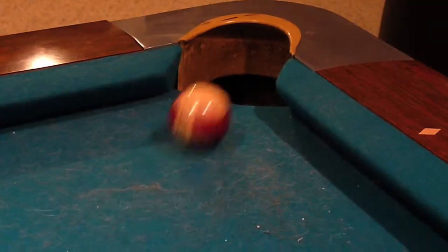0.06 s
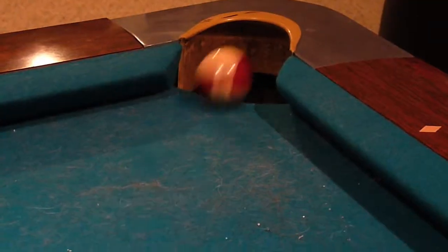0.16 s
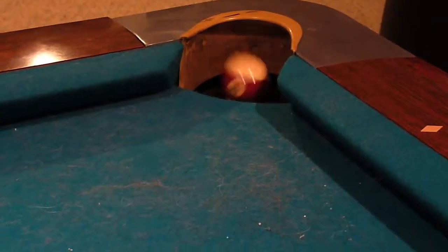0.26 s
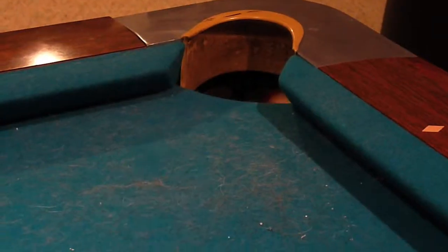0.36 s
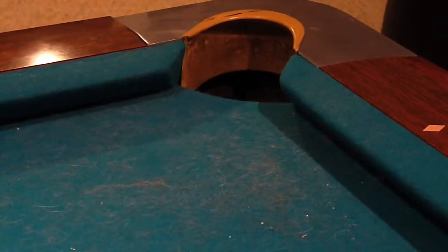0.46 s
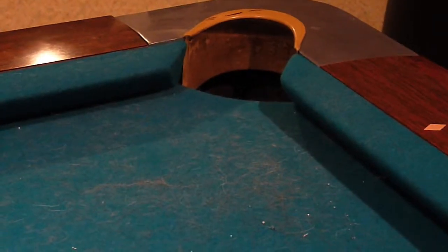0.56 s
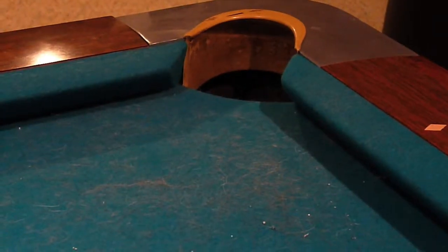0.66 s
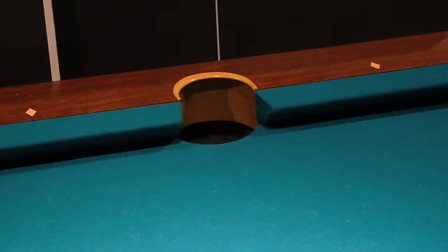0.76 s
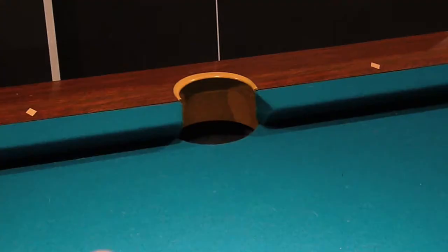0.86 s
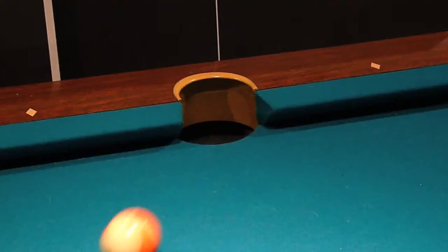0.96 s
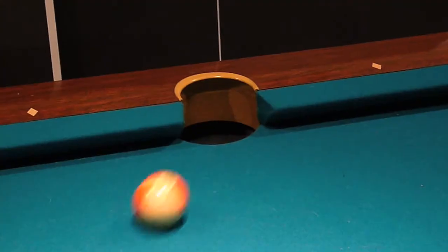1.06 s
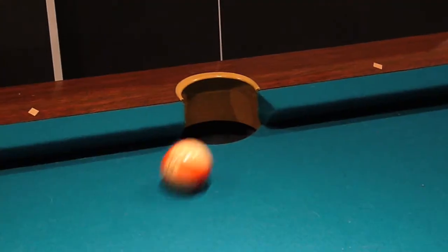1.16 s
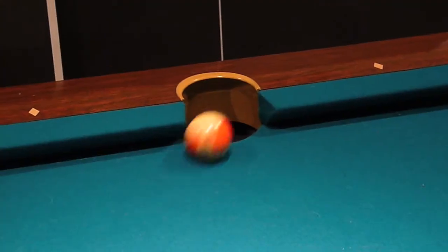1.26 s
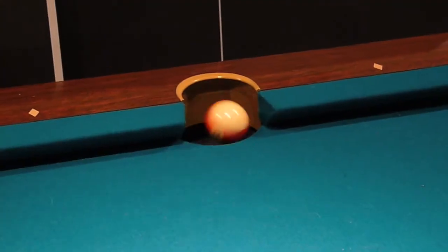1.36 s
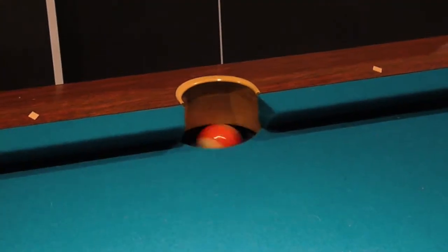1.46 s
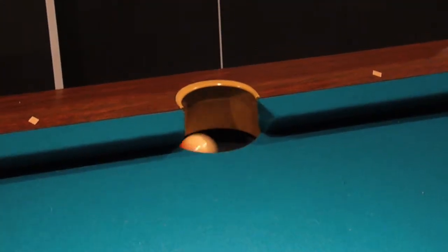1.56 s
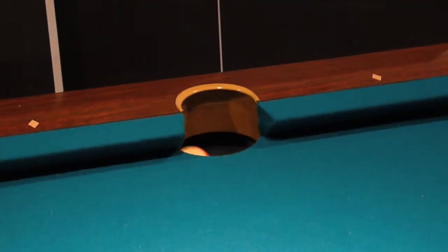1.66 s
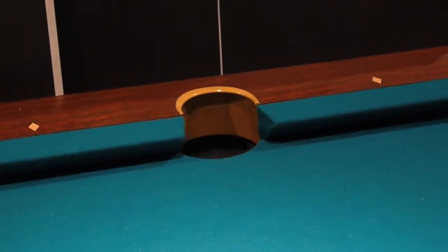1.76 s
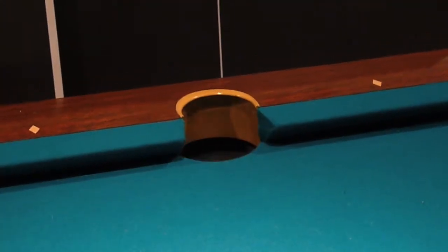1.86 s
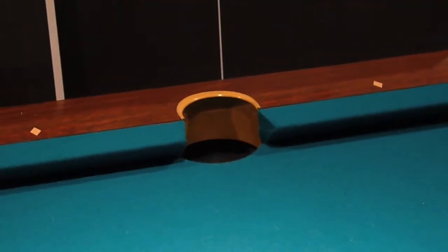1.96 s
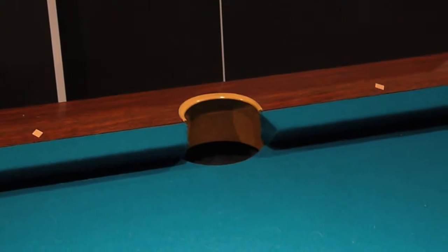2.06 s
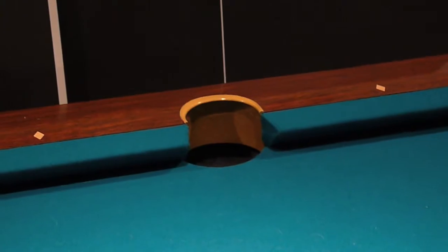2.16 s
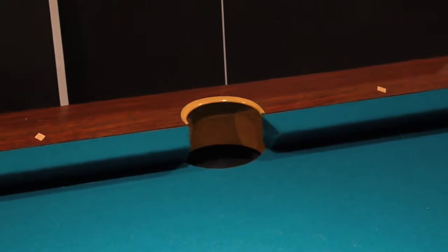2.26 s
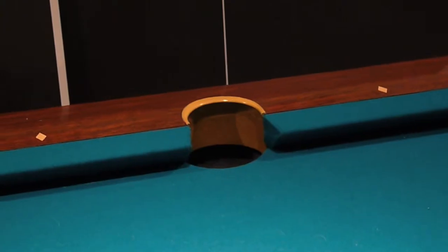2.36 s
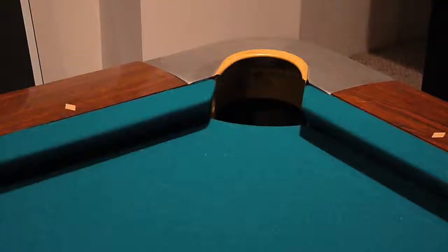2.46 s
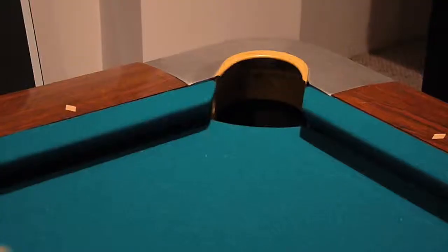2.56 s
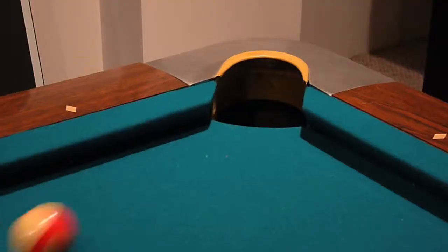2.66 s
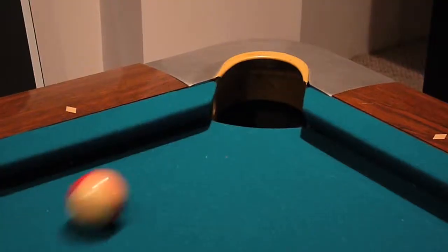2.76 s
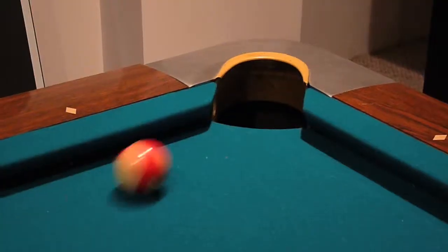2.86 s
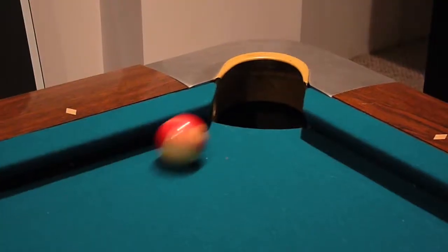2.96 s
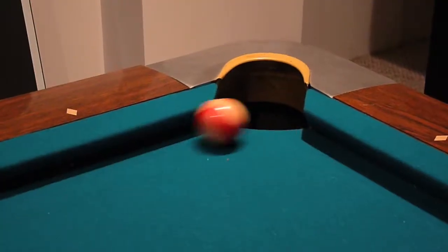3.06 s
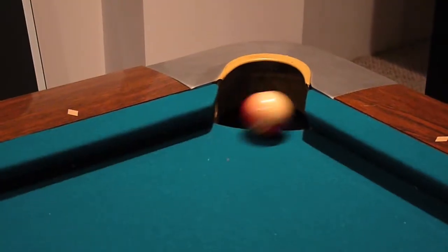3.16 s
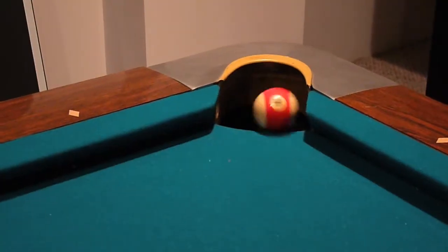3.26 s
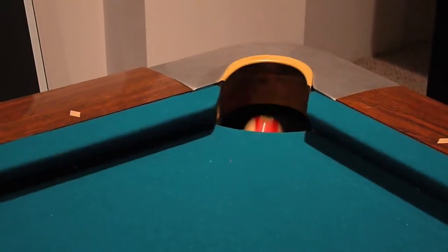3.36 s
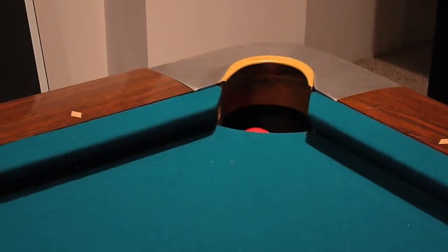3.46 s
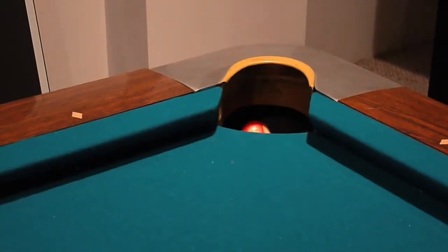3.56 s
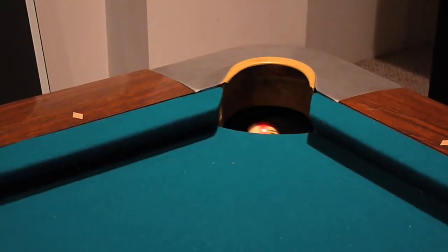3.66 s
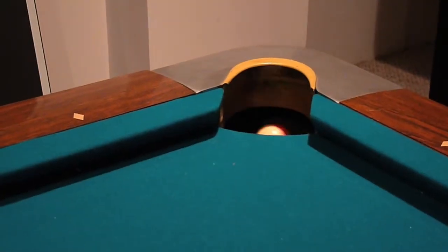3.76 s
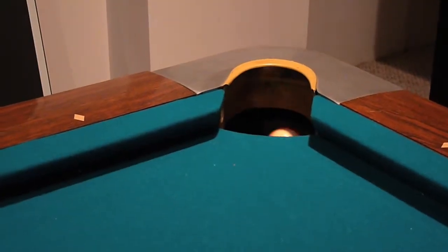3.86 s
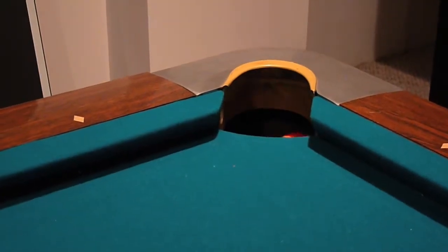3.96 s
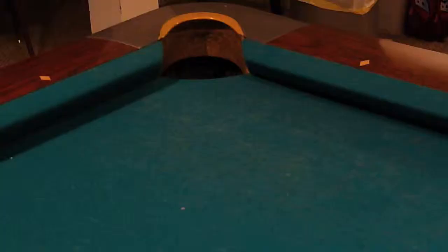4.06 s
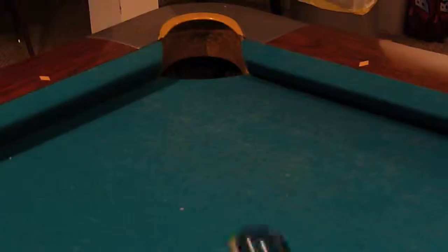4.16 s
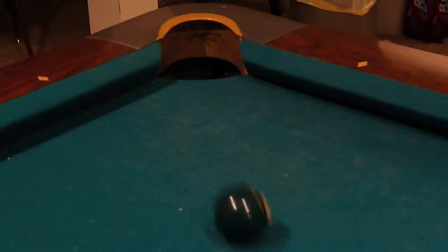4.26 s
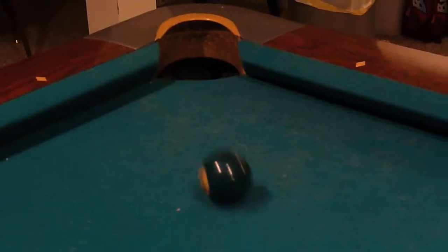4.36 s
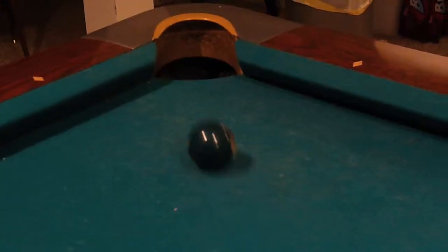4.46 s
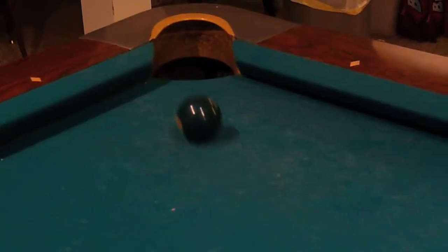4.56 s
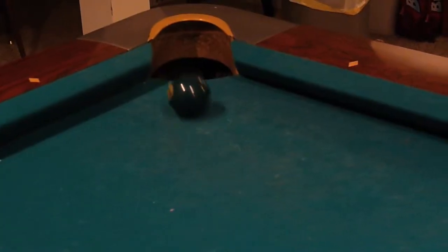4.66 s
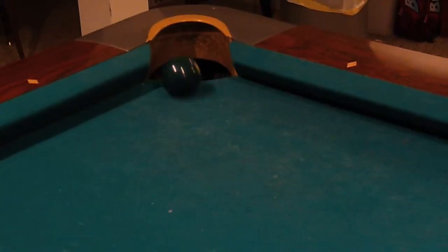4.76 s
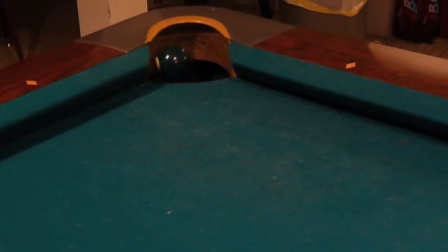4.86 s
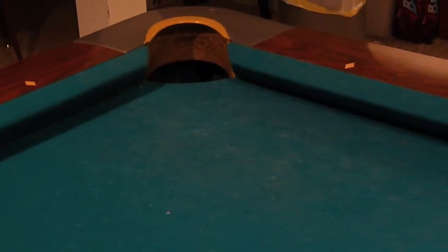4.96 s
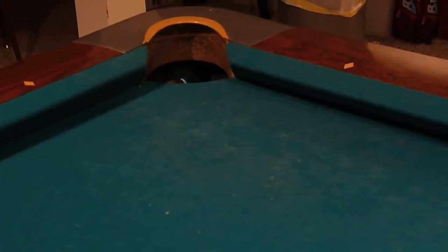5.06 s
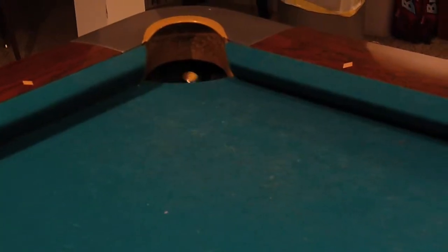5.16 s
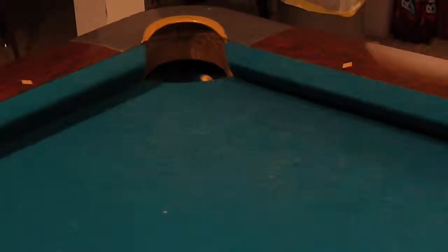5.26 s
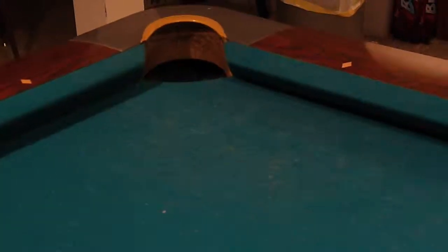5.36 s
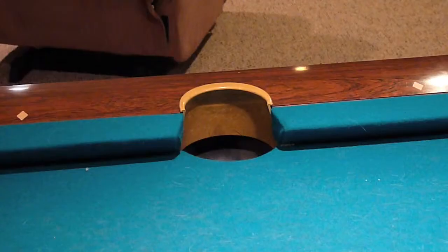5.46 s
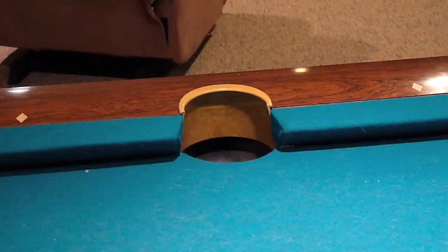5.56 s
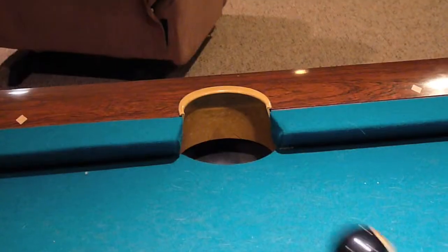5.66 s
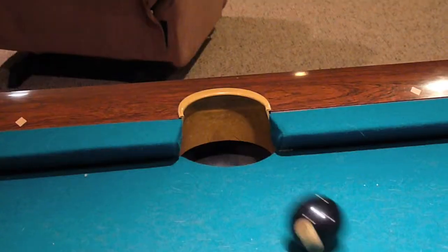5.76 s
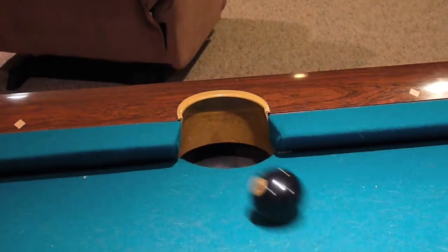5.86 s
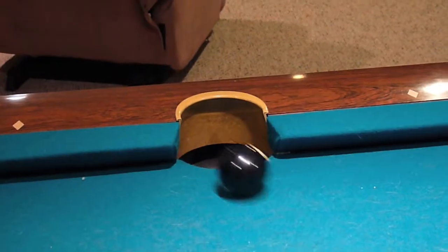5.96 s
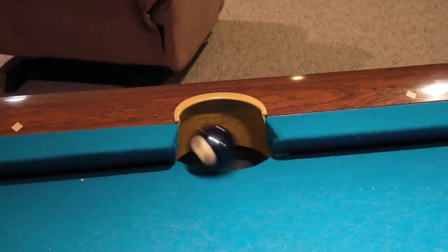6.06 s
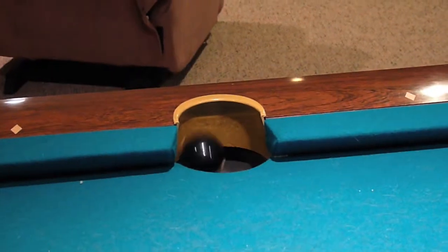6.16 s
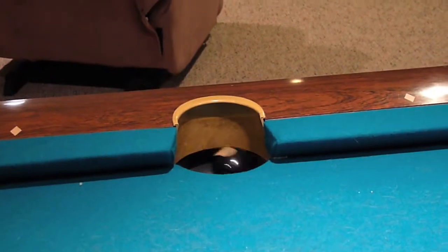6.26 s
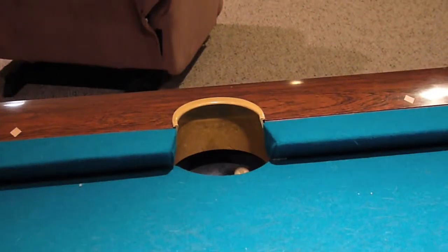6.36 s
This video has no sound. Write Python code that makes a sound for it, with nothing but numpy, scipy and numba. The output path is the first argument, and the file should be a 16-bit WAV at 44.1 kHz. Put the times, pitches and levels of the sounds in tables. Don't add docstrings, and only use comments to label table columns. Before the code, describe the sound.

Five close shots of pool balls dropping into pockets in a quiet furnished room, with dry sound and muted treble. A low rolling rumble opens; at 0.36 s the ball clacks into the pocket, followed by a dense run of hollow knocks and rattles until about 0.8 s. A quick fade to silence and back at 0.85 s. Rolling again, then knocks at 1.5-1.7 s and scattered ones at 2.0-2.45 s, with low slate booms. Fade at 2.55 s. Very faint rolling, a light touch at 3.27 s, then a loud hard crack at 3.45 s and settling thuds to 3.7 s. Fade at 4.15 s. Near quiet, then the loudest, clipped smack at 5.03 s with tumbling knocks to 5.3 s. Fade at 5.5 s. Soft roll, then dull, deep thuds at 6.24-6.36 s. Low room noise, a faint drone and a barely audible high whine persist within shots.

```python
import sys
import numpy as np
from scipy import signal
from scipy.fft import rfft, irfft
from scipy.io import wavfile
from scipy.ndimage import uniform_filter1d
from numba import njit

SR = 44100
rng = np.random.default_rng(int(sys.argv[2]) if len(sys.argv) > 2 else 0)


def amplitude_ratio(level_db):
    exponent = np.asarray(level_db, float) / 20
    return 10 ** exponent


def pcm_store(signal):
    levels = np.round(np.clip(np.atleast_2d(signal), -1, 1) * 32767)
    wavfile.write(sys.argv[1], SR, levels.astype(np.int16).T)


N = 282681
T = np.arange(N) / SR

# silent_s, fade_out_s, fade_in_s
SCENE_CHANGES = [
    (0.845, 0.087, 0.099),
    (2.551, 0.073, 0.098),
    (4.148, 0.11, 0.088),
    (5.518, 0.12, 0.092),
]
# lip_hz, lip_cycles, upper_lip_hz, hard_knock_t60_s, roll_treble_db
POCKETS = [
    (907, 2.2, 1400, .21, -7.5),
    (806, 6.5, 690, 0.21, -3),
    (995, 4.4, 1200, 0.18, -3.5),
    (846, 3.4, 1460, 0.17, -2.5),
    (786, 6.1, 1540, 0.15, -5),
]
# start_s, body_db, centre_hz, lip_db, click_db
CORNER_HITS = [(.362, -11.5, 325, -20, -29.5), (.41, -16.5, 499, -19.5, -46), (.54, -27, 636, -12.5, -20.5),
               (.566, -15.5, 544.5, -25, -33.5), (.643, -16, 403.4, -17.5, -25),
               (0.661, -21.5, 365, -21, -36), (.724, -28.5, 332, -35, -41.5),
               (3.27, -22.5, 232.6, -54.5, -72.5), (3.533, -20, 440, -35, -47),
               (3.569, -26, 326, -41.5, -50), (3.632, -15.5, 404.3, -16, -44.5),
               (5.165, -14, 397, -22, -25.5), (5.242, -22.5, 453, -42, -37), (5.288, -28, 161, -52, -42)]
# start_s, body_db, centre_hz, lip_db, click_db
SIDE_HITS = [(1.485, -17, 355, -16.5, -37.5), (1.528, -17.5, 262.5, -30, -44),
             (1.686, -27.5, 275, -40.5, -46), (1.719, -28.5, 206.3, -35.5, -62.5),
             (1.985, -23.5, 539, -22.5, -42), (2.098, -16.5, 318.6, -21, -44.5),
             (2.404, -18.5, 302, -24.5, -42), (2.451, -25.5, 281, -32, -61),
             (6.243, -28.5, 724, -27.5, -42), (6.267, -14.5, 171, -18, -35.5),
             (6.32, -17.5, 143.5, -21, -50)]
# start_s, push_db, push_hz, push_cycles, thump_db
BLOWS = [
    (3.44977, 0, 530, 2.1, -23),
    (5.03481, 7.5, 1080, .86, -14),
]


def shot(s):
    return np.searchsorted([change[0] for change in SCENE_CHANGES], s)


def add(out, s, x):
    start = int(s * SR)
    later_changes = [change[0] for change in SCENE_CHANGES if change[0] > s]
    end = int(min(later_changes + [N / SR]) * SR)
    out[start:min(start + len(x), end)] += x[:end - start]


def shaped(points, size):
    hz, db = np.transpose(points)
    f = np.maximum(np.fft.rfftfreq(size, 1 / SR), 1)
    spectrum = rfft(rng.standard_normal(size)) * amplitude_ratio(np.interp(np.log(f), np.log(hz), db))
    x = irfft(spectrum, size)
    return x / x.std()


def peak_gain(hz, peaks):
    return np.sqrt(sum(amplitude_ratio(db) ** 2 / (1 + (2 * (hz - f) / width) ** 2) for f, width, db in peaks))


@njit
def ring(hz, gain, t60, rise, size):
    y = np.zeros(size)
    for k in range(len(hz)):
        turn = np.exp(2j * np.pi * hz[k] / SR - np.log(1000.) / (t60[k] * SR))
        z, swell, shrink = gain[k] + 0j, 1., np.exp(-1 / (rise[k] * SR))
        for i in range(min(size, int(1.3 * t60[k] * SR))):
            z, swell = z * turn, swell * shrink
            y[i] += z.imag * (1 - swell)
    return y


def burst(db, hz, cycles, soft):
    t = T[:SR // 12]
    swell = 1 - np.exp(-(t * hz / soft) ** 2)
    decay = np.exp(-2.2 * hz * t / cycles)
    return -amplitude_ratio(db) * swell * np.sin(2 * np.pi * hz * t) * decay


def knocks():
    # start_s, body_db, centre_hz, lip_db, t60_s
    bumps = [(.455, -24.5, 492, -34.5, 0.23), (0.48, -20, 159.6, -32.5, 0.19),
             (.712, -18, 336.5, -24.5, 0.24), (.744, -22, 531.7, -27.5, 0.24), (0.761, -41, 322, -31, 0.28),
             (.784, -40, 291, -37, 0.51), (1.503, -19, 217.2, -28, 0.3), (1.564, -30, 207, -35, 0.2),
             (1.628, -23.5, 243, -47.5, 0.13), (2.007, -19, 296, -22.5, 0.081),
             (2.136, -22.5, 269, -42.5, 0.25), (2.248, -35.5, 269.5, -81, 0.25),
             (3.319, -32, 229, -81, 0.27), (3.381, -55.5, 225, -56.5, 0.12), (3.49, -16.5, 424.4, -39, 0.4),
             (3.675, -27.5, 639.6, -26, 0.17), (3.717, -36, 178, -53, 0.2), (5.07, -18.5, 299, -30.5, 0.23),
             (5.117, -21.5, 304.9, -31.5, 0.45), (5.204, -20.5, 518, -26.5, 0.16),
             (6.289, -19, 220, -29, 0.18), (6.356, -24, 375.5, -45, 0.31)]
    # start_s, body_db, centre_hz, t60_s
    nudges = [(.211, -48, 196, 0.36), (2.626, -46.5, 158, 0.26), (2.818, -45.5, 178.6, 0.33),
              (4.096, -26, 409, 0.32), (5.564, -36.5, 180.7, 0.13), (5.623, -44, 185, 0.098),
              (5.803, -46.5, 500, 0.11), (5.864, -44.5, 415, 0.14)]
    # lip_db, click_db, body_db, t60_s, centre_hz
    after_blows = [
        (-23.5, -28, -13, 0.08, 410),
        (-17.5, -33, -14.5, 0.15, 260),
    ]
    soft_click_db, nudge_lip_db = -18, -18
    found = []
    for s, db, hz, lip_db, click_db in [*CORNER_HITS, *SIDE_HITS]:
        found.append((s, lip_db, click_db - 1, db, POCKETS[shot(s)][3], hz))
    for s, db, hz, lip_db, t60 in bumps:
        found.append((s, lip_db, lip_db + soft_click_db, db, t60, hz))
    for s, db, hz, t60 in nudges:
        lip_db = db + nudge_lip_db
        found.append((s, lip_db, lip_db + soft_click_db, db, t60, hz))
    return sorted(found) + [(blow[0], *knock) for blow, knock in zip(BLOWS, after_blows)]


def clacks():
    # start_s, peak_db, pitch_hz, cycles
    snaps = [
        (3.4503, 1.3, 1610, 1.02),
        (3.45031, .3, 3010, 1.15),
        (3.45035, -24, 6030, 9),
        (5.03431, -11.5, 2210, 5.5),
        (5.03428, -13, 5040, 1.6),
        (5.03507, -21, 3510, 2),
    ]
    # start_s, peak_db, pitch_hz, cycles
    touches = [(.362, -19, 1160, 9), (.541, -18, 1120, 2.7), (.5405, -38.5, 4560, 2.7),
               (.645, -44, 4580, 2.7), (.915, -51, 1890, 9.9), (1.687, -27, 820, 8.5),
               (2.405, -29, 1590, 14), (3.272, -37, 720, 3.7), (3.273, -57, 1650, 12),
               (3.635, -47.5, 2940, 9.1), (5.0362, -18, 1430, 6.8), (5.038, -28.5, 1400, 30),
               (6.312, -33.5, 1366, 4.2), (6.3115, -36.5, 3000, 3.3)]
    lag_s, tick_lead_s = .001, 0.00092
    out, hits = np.zeros(N), [*CORNER_HITS, *SIDE_HITS]
    detune = 1 + 0.074 * rng.standard_normal((len(hits), 3))
    for (s, _, _, lip_db, click_db), (low, high, tick) in zip(hits, detune):
        lip_hz, cycles, upper_hz = POCKETS[shot(s)][:3]
        lip = burst(lip_db + 4, low * lip_hz, cycles, 0.35)
        upper_lip = burst(click_db + 1, high * upper_hz, 2.7 * cycles, 0.97)
        crisp_edge = burst(click_db - 6, high * 3180, 4.3, 1.2)
        add(out, s + lag_s, lip + upper_lip + crisp_edge)
        add(out, s + lag_s - tick_lead_s, burst(click_db + 0.5, tick * 2388, 6.9, 1.8))
    for s, db, hz, cycles, thump_db in BLOWS:
        push = burst(db, hz, cycles, .3)
        thump = burst(thump_db, 420, .8, .15)
        add(out, s, push + thump)
    for s, db, hz, cycles in [*snaps, *touches]:
        add(out, s, burst(db, hz, cycles, 0.45))
    return out


def thuds(count=32):
    # pitch_hz, width_hz, level_db
    table_modes = [(79, 80, 9), (106, 8.3, -7.5), (161, 7.1, 8), (207, 52, 4.5), (255, 36, -4.5),
                   (294, 33, 1.5), (308, 46, 3.5), (409, 22, 5.5), (470, 57, -1), (536, 160, 4),
                   (700, 30, -19.5)]
    out, blows = np.zeros(N), knocks()
    chance = rng.random((len(blows), 3, count))
    for (s, lip_db, _, db, t60, centre_hz), (place, weight, life) in zip(blows, chance):
        hz = 125 * 2 ** (2.9 * (np.arange(count) + place) / count)
        hz[0] = centre_hz
        top_db = min(lip_db - db - 2.0, -4)
        skirt_db = np.interp(np.log(hz), np.log([centre_hz / 4, centre_hz, 1000]), [-22, 0, top_db])
        gain = amplitude_ratio(skirt_db) * peak_gain(hz, table_modes) * (2 * weight - 1)
        gain[0] = 2.01
        gain = gain / np.linalg.norm(gain)
        decay = t60 * (hz / 300) ** -.2 * (0.67 + 0.58 * life)
        add(out, s + .001, amplitude_ratio(db + 1.0) * ring(hz, gain, decay, 0.45 / hz, SR // 2))
    return out


def rattles():
    out, t = np.zeros(N), T[:SR // 3]
    rise = np.minimum(t / 0.0014, 1) ** 2
    for hz in 650 * 2 ** np.arange(0, 3.1, .5):
        power = np.zeros(N)
        for s, lip_db, click_db, _, t60, _ in knocks():
            levels_db = [lip_db, lip_db, click_db, click_db - 23, click_db - 33]
            db = np.interp(np.log(hz), np.log([650, 1130, 2220, 3800, 5210]), levels_db)
            fall = amplitude_ratio(-120 * t / (t60 * .5 * (hz / 1000) ** -.3))
            linger = 0.093 * fall ** 0.34
            add(power, s + .001, amplitude_ratio(2 * (db - 13.5)) * (fall + linger) * rise)
        band = [(hz / 2.2, -80), (hz / 1.4, -10), (hz, 0), (hz * 1.4, -10), (hz * 2.2, -80)]
        out += np.sqrt(power) * shaped(band, N)
    return out


def booms():
    # start_s, peak_db, pitch_hz
    drops = [(0.361, -32, 120.6), (.74, -42, 76), (1.487, -27.5, 103), (1.575, -27, 79), (1.688, -28, 80),
             (2.096, -39, 89.6), (2.404, -38.5, 87.8), (2.449, -33.5, 78), (3.27, -40, 116.4),
             (3.456, -31, 113.5), (3.529, -25, 113), (3.629, -46, 92), (3.72, -39, 81), (5.037, -33.5, 106),
             (5.116, -26.5, 121.3), (5.166, -36, 124), (5.244, -27.5, 121.7), (6.267, -25.5, 130),
             (6.32, -27.5, 123.6)]
    out = np.zeros(N)
    gain, t60 = np.array([.45, 1., -.45]), np.full(3, 0.26)
    for s, db, hz in drops:
        near = hz * np.array([.8, 1., 1.22])
        add(out, s, amplitude_ratio(db - 4.5) * ring(near, gain, t60, 0.31 / near, SR // 2))
    return out


def rolling():
    # time_s, level_db
    roll_path = [(0, -48.5), (.33, -48.5), (.92, -52.5), (1.45, -50.5), (1.9, -52.5), (2.35, -46.5),
                 (2.65, -57), (2.79, -69), (2.83, -71), (3.05, -65), (3.1, -58), (3.9, -64.5), (4.5, -63.5),
                 (4.84, -58.5), (5.6, -54), (5.9, -66), (6.04, -65), (6.12, -54.5)]
    # pitch_hz, width_hz, level_db
    slate_modes = [(94, 13, -1.5), (192, 28, -4.5), (294, 44, 2.5), (388, 22, 2.5), (530, 120, -5.5),
                   (836, 120, -10.5)]
    hz = np.geomspace(30, 2400, num=200)
    slate_db = 20 * np.log10(peak_gain(hz, slate_modes))
    low = shaped(np.transpose([hz, slate_db - 11.2 * np.log2(hz / 125) ** 2]), N)
    high = shaped(np.transpose([hz, slate_db - 2.9 * np.log2(hz / 480) ** 2]), N)
    high = high * amplitude_ratio(np.array(POCKETS)[shot(T), 4])
    dents = np.repeat(rng.standard_normal(N // 900 + 1), 900)[:N]
    dents_db = 2.2 * uniform_filter1d(dents, 600)
    return (low + high) * amplitude_ratio(np.interp(T, *np.transpose(roll_path)) + dents_db)


def walls(x):
    t, out = T[:SR // 2], np.zeros(N)
    low_points = [(60, -4.0), (300, -4.5), (900, -11.0), (1800, -22.0), (4000, -78.5)]
    high_points = [(100, -75), (700, -38.5), (1500, 0.5), (4000, -14.5), (8000, -36.5)]
    ends = [0] + [int(change[0] * SR) for change in SCENE_CHANGES] + [N]
    for a, b in zip(ends, ends[1:]):
        low = shaped(low_points, len(t)) * amplitude_ratio(-60 * t / 0.29)
        high = shaped(high_points, len(t)) * amplitude_ratio(-60 * t / 0.41 - 12.5)
        echo = (low + high) * np.minimum(t / 0.015, 1) ** 2
        out[a:b] = signal.fftconvolve(x[a:b], echo)[:b - a]
    return out


def room_noise():
    # pitch_hz, level_db (per Hz)
    room_spectrum = [(12, -30), (20, -15), (35, -30.5), (55, -15.5), (270, -24), (1130, -36), (7500, -44.5),
                     (10000, -71)]
    return amplitude_ratio(-59.5) * shaped(room_spectrum, N)


def hum():
    # pitch_hz, width_hz, level_db
    appliance = [(300, 20, -2), (505, 36, 0), (583, 41, -3), (822, 20, -1.5)]
    hz = np.geomspace(150, 1600, num=300)
    drone = shaped(np.transpose([hz, 40 * np.log10(peak_gain(hz, appliance))]), N)
    whine = np.sin(2 * np.pi * 6666 * T)
    return amplitude_ratio(-65.5) * drone + amplitude_ratio(-85.5) * whine


def scene():
    hits = clacks() + thuds() + rattles() + booms()
    echo = amplitude_ratio(-43.5) * walls(hits)
    return (hits + echo + rolling() + room_noise() + hum())[None]


def top_cut(x):
    return signal.sosfilt(signal.butter(12, 7870, fs=SR, output="sos"), x)


def record(dry):
    clip_level, top_hz, offset = .62, 7000, -.0046
    x = np.clip(dry, -clip_level, clip_level)
    x = signal.sosfilt(signal.butter(14, top_hz, fs=SR, output="sos"), x) + offset
    for s, out_s, in_s in SCENE_CHANGES:
        x = x * np.interp(T, [s - out_s, s, s + in_s], [1, 0, 1])
    hiss = amplitude_ratio(-104) * rng.standard_normal(N)
    return top_cut(x + hiss)


dry = scene()
out = record(dry)
pcm_store(out)
```